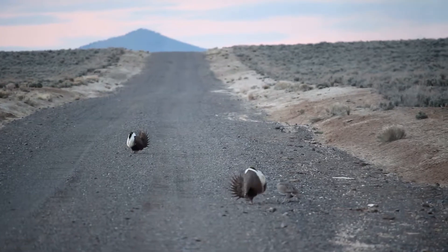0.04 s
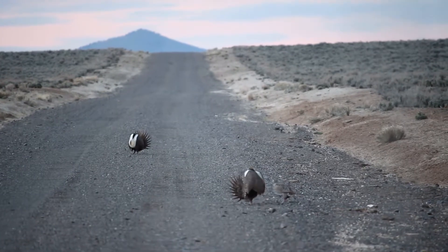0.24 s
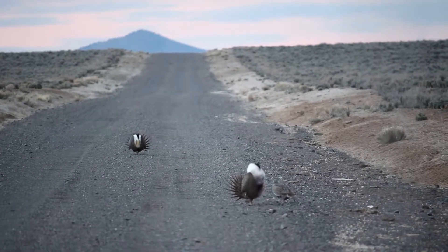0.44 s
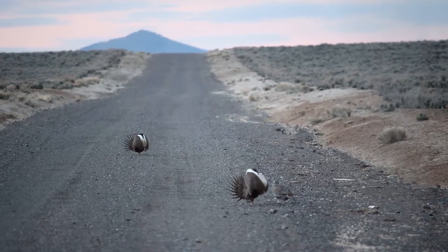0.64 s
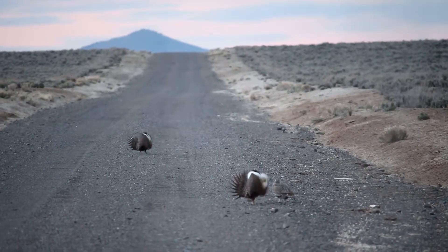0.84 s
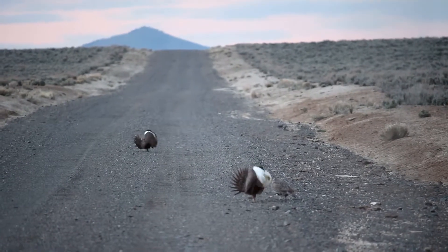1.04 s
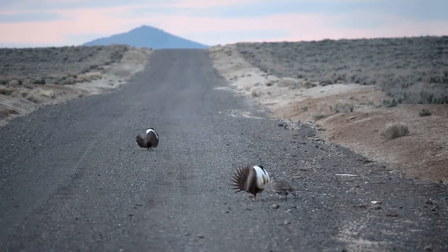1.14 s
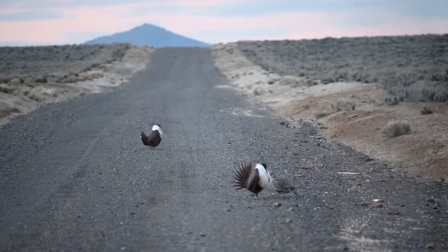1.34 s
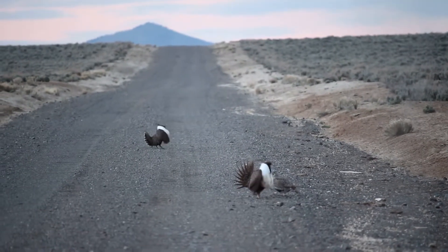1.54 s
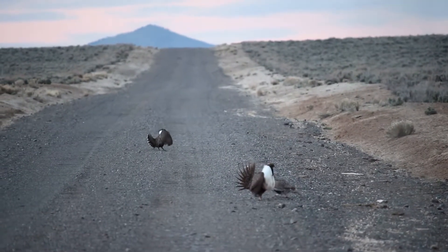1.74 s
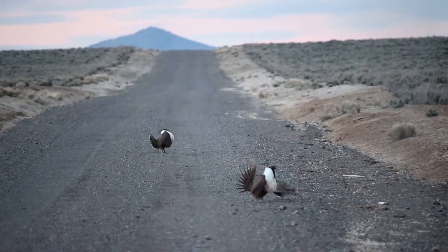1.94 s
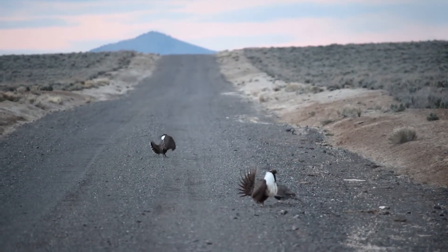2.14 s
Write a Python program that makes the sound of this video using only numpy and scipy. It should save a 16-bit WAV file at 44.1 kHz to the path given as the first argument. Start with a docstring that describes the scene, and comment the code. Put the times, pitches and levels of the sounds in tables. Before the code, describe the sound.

Gusty wind buffeting the microphone, with faint pops and whistles from displaying grouse.

```python
"""Sage-grouse in gusty wind

Grouse display on an open gravel road: a soft coo, then an air-sac pop and an arching whistle, twice over.
Stiff feathers swish and a far bird peeps. Gusts buffet the two microphone ports, pushing one and pulling
the other, over a steady hiss; a limiter ducks the mix in the strongest gust."""
import sys
import numpy as np
from scipy import signal
from scipy.fft import rfft, irfft
from scipy.io import wavfile
from scipy.ndimage import uniform_filter1d, minimum_filter1d

SR = 44100
rng = np.random.default_rng(int(sys.argv[2]) if len(sys.argv) > 2 else 0)


def inscribe(sig):
    """Save sig as 16-bit PCM at rate SR to the path in sys.argv[1].

    A 1-D sig is mono; a 2-D sig holds one channel per row.
    Samples are clipped to [-1, 1] before scaling.
    """
    pcm = np.round(np.clip(np.atleast_2d(sig).T, -1, 1) * 32767)
    wavfile.write(sys.argv[1], SR, pcm.astype(np.int16))


N = 97020
T = np.arange(N) / SR

# tone of the hiss: frequency_hz, relative_db
HISS_SPECTRUM = [(100, -3.5), (380, 4), (600, 2), (1000, 0.5), (1600, -3.5), (2400, -3.5), (5000, -7),
                 (9000, -12.5), (15000, -20)]
# tone of the wind: frequency_hz, relative_db
WIND_SPECTRUM = [(15, -30), (25, -11), (65, 3.5), (113, 6), (192, -2.5), (308, -12), (412, -23.5),
                 (628, -39), (1200, -55.5), (2600, -86)]
# the wind's swells and lulls: time_s, relative_db, left_minus_right_db
GUST_CURVE = [(0.0, -33.5, -10), (0.074, -35.5, -5.5), (0.104, -26.5, -2.5), (0.18, -32.5, -2.5),
              (0.222, -20, 5.5), (0.262, -35, -5.5), (0.331, -23, -1), (0.343, -11, 8.5), (0.457, -9.5, -9),
              (0.518, -20.5, -0.5), (0.567, -6, -2), (0.606, -19.5, -3), (0.632, -16, -5),
              (0.778, -22.5, -5), (0.841, -14, -1.5), (0.866, -23.5, -4), (0.905, -16.5, -2.5),
              (0.921, -34, -8), (0.961, -16, -5.5), (1.02, -13, -2.5), (1.092, -29, -3),
              (1.16, -25.5, -0.5), (1.269, -38, 3.5), (1.293, -16, 7), (1.36, -31.5, 5.5),
              (1.454, -37.5, -3), (1.508, -19.5, -7), (1.563, -39.5, -3.5), (1.682, -41.5, -4),
              (1.716, -30, 6), (1.848, -39.5, -1.5), (1.88, -37, 8.5), (1.98, -33, 7), (2.003, -41, 4),
              (2.083, -36, 7), (2.195, -39, -13)]
# single eddies hitting the microphone: centre_s, strength_db, left_minus_right_db, pitch_hz
BUFFET_HITS = [(.102, -26, -4, 115), (0.211, -17, 7, 110.3), (0.3466, -2.5, 6.5, 180),
               (0.3549, -10.5, 5.5, 191), (0.383, -8, 10, 159), (0.3953, -1.5, 16, 153),
               (0.4124, -1.5, -8.5, 227), (0.417, 5, -4, 138), (0.4366, -2, -7, 190),
               (0.4514, -1, -6, 121.7), (0.4586, -1.5, -6, 210), (0.4716, -6, -6, 150),
               (0.5518, -8.5, 23, 139), (0.5696, -5, -0.5, 119), (0.6271, -4, -10, 167),
               (0.8953, -4, -8, 126), (0.9859, -6.5, -7, 129), (1.165, -13, -7.5, 120),
               (1.2911, -7, 10.5, 113), (1.2994, -9.5, 7, 96), (1.488, -16.5, -4, 144),
               (1.511, -14, 0, 100), (1.718, -29, 7, 108), (1.785, -27, 11, 130), (1.884, -22, 8, 69.4),
               (1.937, -23.5, 7, 115), (1.972, -19, 7.5, 103)]
# grouse coos: start_s, length_s, first_hz, middle_hz, last_hz, level_db
COO_NOTES = [(0.285, 0.048, 492, 443, 391, -44), (0.917, 0.059, 470, 518.6, 530, -40)]
# air-sac pops, each with its whistle: start_s, level_db, snap_gap_s, second_snap_relative_db, centre_hz,
# cut_an_octave_away_db, whistle_db, whistle_stretch_ratio, whistle_swell_db
POP_CALLS = [(0.441, -35.5, 0.0039, -5.5, 1900, 18, -48, .96, -11.5),
             (1.089, -44.5, 0.002235, 2.5, 1400, -1.5, -57, 1.01, 2.5)]
# air-sac resonances: pitch_hz, relative_db, t60_s
SAC_RINGS = [(506, 5.5, 0.018), (978, 0, 0.031), (1590, -3.5, 0.012), (1850, -1.5, 0.012),
             (2120, -3.5, 0.015), (2890, -6, 0.014), (3470, -13, 0.016)]
# the whistle's arch before stretch and swell: after_pop_s, pitch_hz, relative_db
WHISTLE_ARCH = [(.002, 980, 5), (.018, 1165, 0), (.036, 1440, 0.5), (.047, 1786, -1.5), (.058, 2342, -10),
                (.069, 2748, 0), (.076, 2450, 3), (.083, 1472, -2.5), (.092, 930, -6.5)]
# wing strokes over the breast: start_s, length_s, first_hz, middle_hz, last_hz, level_db
WING_STROKES = [(0.543, .05, 4150, 3484, 3160, -60.5), (.578, .058, 2560, 3256, 4150, -64)]
# a far bird's note: time_s, pitch_hz, level_db
PEEP_CURVE = [(1.636, 2200, -74), (1.649, 2300, -58), (1.667, 2225, -59), (1.69, 2300, -67),
              (1.702, 2300, -80)]


def undb(db):
    """Decibels to gain."""
    return 10 ** (np.asarray(db) / 20)


def unit(x):
    """Scale to rms 1."""
    return x / np.sqrt(np.mean(x ** 2))


def pan(pan_db):
    """Constant-power left and right gains; positive leans left."""
    gains = undb(np.array([pan_db, -pan_db]) / 2).reshape(2, -1)
    return gains / np.sqrt(np.mean(gains ** 2, axis=0))


def wander(rate_hz):
    """Smooth random movement, rms 1."""
    hold = max(int(SR / rate_hz), 1)
    steps = np.repeat(rng.standard_normal(N // hold + 2), hold)
    return unit(uniform_filter1d(steps, hold)[:N])


def noise(spectrum):
    """Two unrelated noises with the given spectrum, rms 1."""
    hz, db = np.array(spectrum).T
    bin_hz = np.maximum(np.arange(N // 2 + 1) * SR / N, 1)
    eq = undb(np.interp(np.log(bin_hz), np.log(hz), db))
    return unit(irfft(rfft(rng.standard_normal((2, N))) * eq, N))


def tone(hz):
    """A sine that follows a pitch curve."""
    return np.sin(2 * np.pi * np.cumsum(hz) / SR)


def glide(points, start_s=0):
    """A pure note sliding through points of time_s, pitch_hz, level_db."""
    time_s, hz, db = np.array(points).T
    gate = (T > start_s + time_s[0]) & (T < start_s + time_s[-1])
    pitch = uniform_filter1d(np.interp(T - start_s, time_s, hz), size=256)
    envelope = uniform_filter1d(gate * undb(np.interp(T - start_s, time_s, db)), size=128)
    return tone(pitch) * envelope


def bend(start_s, length_s, first_hz, middle_hz, last_hz):
    """A pitch curve through three values, and a swell that fades in and out over it."""
    progress = np.clip((T - start_s) / length_s, 0, 1)
    parabola = np.polyfit([0, .5, 1], [first_hz, middle_hz, last_hz], 2)
    return np.polyval(parabola, progress), np.sin(np.pi * progress) ** 2


def hiss(gain_db=-55.5, crossfeed=0.26):
    """A steady bed of hiss, widened by an inverted, darker feed from the opposite side."""
    air = noise(HISS_SPECTRUM)
    opposite = signal.lfilter(*signal.butter(1, 5000, fs=SR), air[::-1])
    return undb(gain_db) * (air - crossfeed * opposite) * pan(-1)


def wind(trim_db=-1.5, neutral_db=-18.5, brighten=0.33, flicker_db=4.5, crossfeed=0.4):
    """Eddies push one port and pull the other; stronger gusts are brighter, lulls only rumble."""
    time_s, db, pan_db = np.array(GUST_CURVE).T
    gust_db = np.interp(T, time_s, db)
    tilt_db_per_octave = brighten * np.minimum(gust_db - neutral_db, 4)
    eddies = rfft(noise(WIND_SPECTRUM))
    bin_hz = np.arange(N // 2 + 1) * SR / N
    bin_octave = np.log2(np.clip(bin_hz / 100, .5, 8))
    rumble = 0
    for octave in range(-1, 4):  # bands from 50 to 800 Hz, each flickering on its own
        band = irfft(eddies * np.maximum(1 - abs(bin_octave - octave), 0), N)
        rumble = rumble + band * undb(octave * tilt_db_per_octave + flicker_db * wander(70))
    # even out the level so the gust curve shapes the swells
    rumble = rumble / np.sqrt(uniform_filter1d(rumble ** 2, size=2000, axis=1))
    rumble = unit(rumble - crossfeed * rumble[::-1])
    return rumble * undb(gust_db + trim_db) * pan(np.interp(T, time_s, pan_db))


def buffets():
    """A lone eddy lands one sharp low thump, opposite in polarity at the two ports."""
    out = 0
    for centre_s, db, pan_db, hz in BUFFET_HITS:
        offset_squared = (np.pi * hz * (T - centre_s)) ** 2
        thump = (1 - 3 * offset_squared) / (1 + offset_squared) ** 3
        polarity = np.array([[-1], [1]]) * np.sign(pan_db)
        out = out + undb(db) * thump * polarity * pan(pan_db) / np.sqrt(2)
    return out


def coos(octave_db=-29.5):
    """Soft, almost pure hoots with a faint octave on top."""
    out = 0
    for *shape, db in COO_NOTES:
        hz, swell = bend(*shape)
        out = out + undb(db) * swell * (tone(hz) + undb(octave_db) * tone(2 * hz))
    return out


def pops(attack_s=0.00033):
    """The air sacs snap twice in quick succession and ring briefly."""
    out = 0
    for start_s, db, gap_s, second_db, centre_hz, cut_db, *_ in POP_CALLS:
        for snap_s, snap_db in ((start_s, db), (start_s + gap_s, db + second_db)):
            age = np.maximum(T - snap_s, 0)
            attack = 1 - np.exp(-age / attack_s)
            for hz, ring_db, t60_s in SAC_RINGS:
                decay = np.exp(-np.log(1000) * np.minimum(age / t60_s, 10))
                gain = undb(snap_db + ring_db - cut_db * np.log2(hz / centre_hz) ** 2)
                out = out + gain * attack * decay * np.sin(2 * np.pi * hz * age)
    return out


def whistles(roughness=0.17):
    """Out of each pop, a slightly grainy whistle arches up and drops."""
    out = 0
    arch_end_s = WHISTLE_ARCH[-1][0]
    for start_s, *_, whistle_db, stretch, swell_db in POP_CALLS:
        points = [(at * stretch, hz, db + swell_db * at / arch_end_s) for at, hz, db in WHISTLE_ARCH]
        grain = 1 + roughness * wander(500)
        out = out + undb(whistle_db) * glide(points, start_s) * grain
    return out


def swishes(width_hz=900):
    """Wings rub over stiff breast feathers: a rough band whose pitch follows the stroke."""
    out = 0
    for *shape, db in WING_STROKES:
        hz, swell = bend(*shape)
        phase = 2 * np.pi * np.cumsum(hz) / SR
        rub = wander(width_hz) * np.sin(phase) + wander(width_hz) * np.cos(phase)
        out = out + undb(db) * np.sqrt(swell) * rub
    return out


def peep():
    """One thin, pure note from a far bird."""
    return glide(PEEP_CURVE)


def open_ground(birds, scatter_db=-8.5, t60_s=0.23):
    """The direct sound, a little to the right, and a short scatter from road and brush."""
    age = T[:SR // 2]
    tail = rng.standard_normal((2, len(age))) * np.exp(-np.log(1000) * age / t60_s)
    tail = tail / np.sqrt(np.sum(tail ** 2, axis=1, keepdims=True))
    scatter = signal.fftconvolve(birds[None], tail, axes=1)[:, :N]
    return birds * pan(-4) + undb(scatter_db) * scatter


def scene():
    """Hiss throughout, wind right on the microphone, birds out in the open."""
    return hiss() + wind() + buffets() + open_ground(coos() + pops() + whistles() + swishes() + peep())


def record(dry, threshold_db=-14.5, attack_s=0.035, release_s=0.065, ceiling=.94, top_hz=15400):
    """A limiter ducks the mix on the hardest gusts, catches peaks and recovers; the top end is cut."""
    step = 1 / (attack_s * SR)
    loudness = np.sqrt(signal.lfilter([step], [1, step - 1], np.mean(dry ** 2, axis=0)))
    overshoot = np.log(np.maximum(loudness / undb(threshold_db), 1))
    release = np.exp(-T / release_s)
    duck = np.maximum.accumulate(overshoot / release) * release  # each overshoot dies away gradually
    gain = np.minimum(np.exp(-duck), ceiling / abs(dry).max(axis=0))
    held = minimum_filter1d(gain, size=401)  # look ahead of the peaks
    smoothed = uniform_filter1d(uniform_filter1d(held, size=201), size=201)
    high_cut = signal.ellip(10, .2, 80, top_hz, fs=SR, output="sos")
    return signal.sosfilt(high_cut, dry * smoothed)


dry = scene()
out = record(dry)
inscribe(out)
```